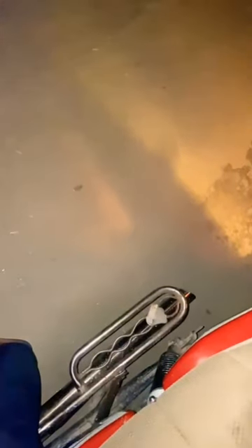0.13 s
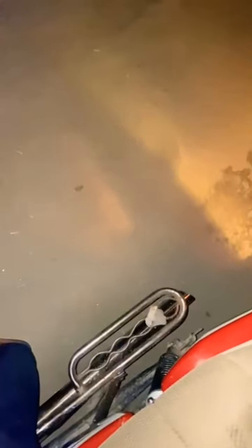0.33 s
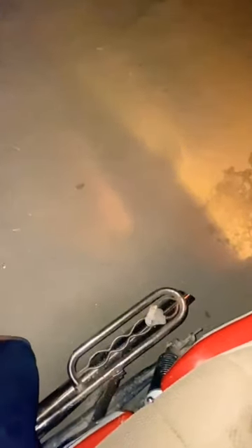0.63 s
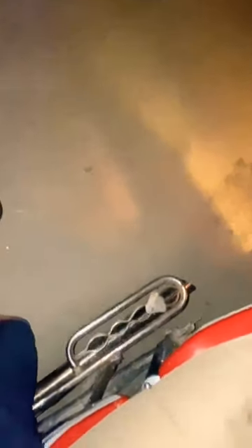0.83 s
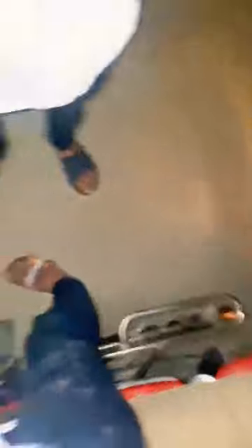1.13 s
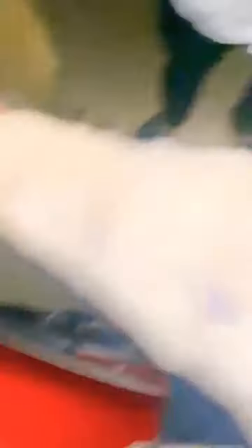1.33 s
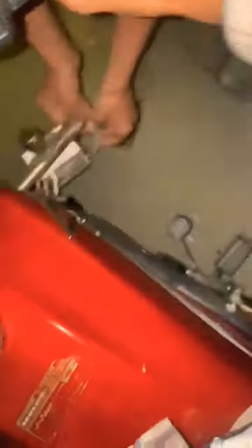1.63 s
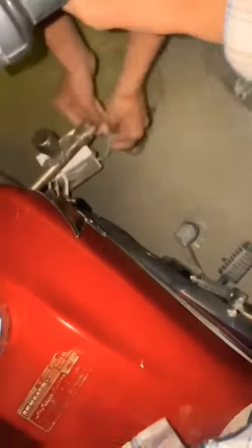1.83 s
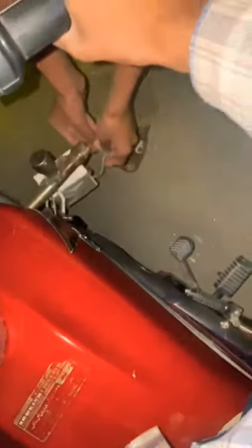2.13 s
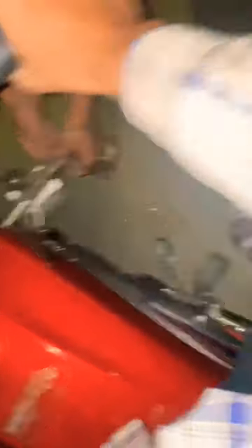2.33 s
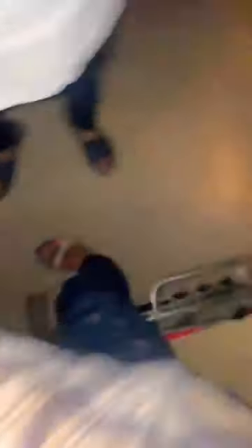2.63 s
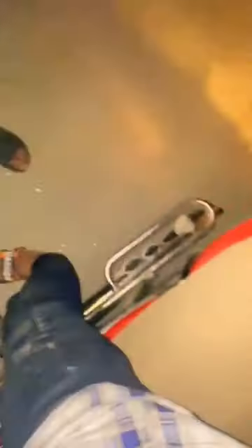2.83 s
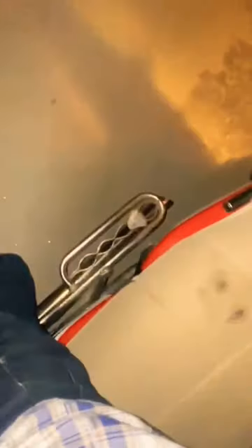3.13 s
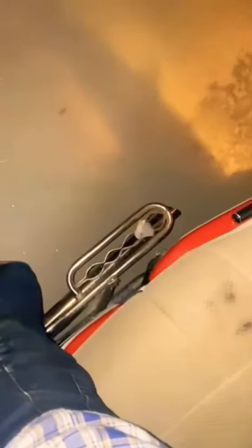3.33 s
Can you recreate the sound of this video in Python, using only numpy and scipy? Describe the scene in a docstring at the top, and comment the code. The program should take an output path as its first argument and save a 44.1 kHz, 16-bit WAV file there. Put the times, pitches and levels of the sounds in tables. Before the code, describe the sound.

A single-cylinder motorcycle revs steadily at a standstill outdoors, very close to a phone microphone; its booming exhaust crackles irregularly, with one loud pop midway and a louder one near the end.

```python
"""A single-cylinder motorcycle engine runs fast and unevenly at a standstill, close to a phone microphone.
Each firing is a soft push that rings the exhaust pipe with a boom. Many charges burn late and crack in the
pipe as decaying noise behind a sharp front, two of them as loud pops; the boom after a crack is early and dull.
The silencer rings with wavering notes, gas noise hisses once a cycle, and low turbulence rumbles.
"""
import sys
import numpy as np
from scipy import signal
from scipy.fft import rfft, irfft, next_fast_len
from scipy.io import wavfile
from scipy.ndimage import uniform_filter1d, map_coordinates

SR = 44100
rng = np.random.default_rng(int(sys.argv[2]) if len(sys.argv) > 2 else 0)


def to_wav(s):
    """Save 16-bit WAV."""
    ch = np.atleast_2d(s).T  # columns
    pcm = np.round(np.clip(ch, -1, 1) * 32767)  # PCM
    wavfile.write(sys.argv[1], SR, pcm.astype(np.int16))


N = 153468


def amp(db):
    """Turn decibels into a plain factor."""
    return 10 ** (np.asarray(db) / 20)


def unit(x):
    """Scale a sound to an rms of 1."""
    return x / np.sqrt(np.mean(x ** 2) + 1e-20)


def curve(rows):
    """Join (seconds, value) points by straight lines, one value per sample."""
    seconds, values = np.transpose(rows)
    return np.interp(np.arange(N) / SR, seconds, values)


def filtered(x, response):
    """Filter x with a response given as a function of frequency in Hz."""
    length = next_fast_len(N + SR // 2)  # spare room keeps the tail from wrapping round
    spectrum = rfft(x, length) * response(np.fft.rfftfreq(length, 1 / SR))
    return irfft(spectrum, length)[:N]


def resonance(f, hz, width):
    """Response of one resonance: strongest at hz, weaker on both sides."""
    return 1j * f * width / (hz * hz - f * f + 1j * f * width)


def ring_pipe(x, modes):
    """Ring several resonances at once; polarity sets which way each one swings."""
    return filtered(x, lambda f: sum(polarity * amp(db) * resonance(f, hz, width)
                                     for hz, width, db, polarity in modes))


def noise(spectrum, patchy_db):
    """Coloured noise of rms 1 with random louder and softer patches in time and frequency."""
    bins = signal.stft(rng.standard_normal(N), nperseg=512)[2]
    patches = uniform_filter1d(rng.standard_normal(bins.shape), 5, 0)
    patches = uniform_filter1d(patches, 6, 1)
    x = signal.istft(bins * amp(patchy_db * unit(patches)), nperseg=512)[1][:N]
    hz, db = np.transpose(spectrum)
    return unit(filtered(x, lambda f: amp(np.interp(np.log(f + 1), np.log(hz + 1), db))))


def even(x):
    """Noise with its slow lumps ironed out, so that each crack has its full size."""
    local_power = np.abs(uniform_filter1d(x ** 2, size=400))
    return unit(x / np.sqrt(local_power + .05))


def wobble(rate):
    """A smooth random curve through the given number of random points a second."""
    points = rng.standard_normal(int(N * rate / SR) + 4)
    return map_coordinates(points, [np.arange(N) * rate / SR])


def pulses(s, size):
    """Impulses at times s in seconds, each shared between the two nearest samples."""
    at = np.clip(s * SR, 0, N - 2)
    i = at.astype(int)
    return np.bincount(i, size * (1 - at + i), N) + np.bincount(i + 1, size * (at - i), N)


# How fast the engine runs. Each row: time in seconds, firings per second.
ENGINE_SPEED = [(0.0, 49.86), (0.1657, 52.68), (0.3314, 49.81), (0.4971, 53.16), (0.6629, 54.04),
                (0.8286, 55.24), (0.9943, 53.51), (1.16, 52.93), (1.3257, 54.21), (1.4914, 51.51),
                (1.6571, 51.46), (1.8229, 51.32), (1.9886, 52.47), (2.1543, 54.09), (2.32, 53.76),
                (2.4857, 52.94), (2.6514, 50.71), (2.8171, 50.85), (2.9829, 48.47), (3.1486, 48.33),
                (3.3143, 51.06), (3.48, 52.21)]
FIRST_PHASE = .018  # part of a cycle before the first firing


def crank():
    """Cycles turned since the start: the running sum of the speed."""
    return np.cumsum(curve(ENGINE_SPEED)) / SR - FIRST_PHASE


# Colour of the low turbulence. Each row: frequency in Hz, strength in dB.
RUMBLE_COLOUR = [(12, -59.5), (20, -37), (43, -9), (75, -9), (95, -5), (120, -27), (210, -120)]
RUMBLE_DB = -19  # against the boom


def rumble():
    """Low turbulence: patchy noise, mostly below 120 Hz."""
    return amp(RUMBLE_DB) * noise(RUMBLE_COLOUR, patchy_db=-4.5)


# Colour of the gas hiss. Each row: frequency in Hz, strength in dB.
HISS_COLOUR = [(900, -30), (1250, 7), (1400, -0.5), (1630, 2.5), (2070, -5), (2500, -4.5), (3900, -10),
               (4700, -16.5), (5250, -6.5), (5860, -10), (6490, -11), (10100, -21), (10600, -46),
               (11000, -52), (14300, -101), (22000, -120)]
# Loudness of the hiss, around which it swells. Each row: time in seconds, level in dB.
HISS_LEVEL = [(0.0, -49.5), (0.4, -44.5), (0.62, -42), (1.22, -43.5), (1.36, -46), (1.55, -46), (1.8, -43),
              (2.36, -44.5), (2.68, -46.5), (2.93, -44), (3.06, -43.5), (3.1, -49.5), (3.2, -44.5),
              (3.48, -42)]
PUFF_DB, PUFF_PHASE = 3, 0.76  # swell up and down in dB; part of the cycle where it is loudest
PATCH_DB = 3


def hiss():
    """Escaping exhaust gas: noise that swells once a cycle."""
    puff_db = PUFF_DB * np.cos(2 * np.pi * (crank() - PUFF_PHASE))
    return amp(curve(HISS_LEVEL) + puff_db) * noise(HISS_COLOUR, PATCH_DB)


# Notes of the silencer, two lower and three upper.
# Each row: frequency in Hz, width in Hz, average strength in dB within its group.
SILENCER_NOTES = [(437.4, 47.5, 3), (529.8, 62, 4), (660, 95, 0), (886, 61, 5.5), (1024.5, 93, -0.5)]
# Loudness of the two groups. Each row: time in seconds, level of the lower notes in dB, of the upper in dB.
SILENCER_LEVEL = [(0.0, -44, -46), (0.13, -43, -38), (0.47, -36.5, -44), (0.64, -43, -37), (0.72, -38, -46),
                  (0.87, -39, -38), (0.91, -42, -60), (1.12, -37.5, -61), (1.135, -34, -36),
                  (1.27, -38, -31.5), (1.35, -38, -41.5), (1.63, -42.5, -37), (1.75, -38, -38),
                  (2.35, -35, -34.5), (2.55, -36, -38), (3.06, -37, -35), (3.1, -52, -44.5),
                  (3.29, -27.5, -33.5), (3.48, -32, -35)]
ROAR_DB = -9  # gas noise against the firings
WAVER_DB, WAVER_S, WAVER_RATE = 4.5, .0004, 16  # swell in dB, bend in seconds, random points per second


def silencer(s, size):
    """Firings and gas roar ring the silencer; its notes waver, and the lower and upper ones swell apart."""
    drive = unit(pulses(s, size)) + amp(ROAR_DB) * rng.standard_normal(N)

    def note(hz, width, db):
        """One resonance that swells and bends at random."""
        x = filtered(drive, lambda f: resonance(f, hz, width) ** 2)
        bent_time = np.arange(N) + SR * WAVER_S * wobble(WAVER_RATE)
        bent = np.interp(bent_time, np.arange(N), x)
        return amp(db + WAVER_DB * wobble(WAVER_RATE)) * bent

    lower = unit(sum(note(*row) for row in SILENCER_NOTES[:2]))
    upper = unit(sum(note(*row) for row in SILENCER_NOTES[2:]))
    t, lower_db, upper_db = np.transpose(SILENCER_LEVEL)
    return amp(curve([*zip(t, lower_db)])) * lower + amp(curve([*zip(t, upper_db)])) * upper


RISE_S, HOLD_S = .0005, .005  # each crack rises fast and holds before it fades


def burst(db, t60):
    """Envelope of all cracks: fast rise, hold, then a fall of 60 dB in t60 seconds."""
    t = np.arange(SR // 10) / SR
    shape = (1 - np.exp(-t / RISE_S)) * amp(-60 * np.maximum(t - HOLD_S, 0) / t60)
    starts = pulses(np.array(LATE_BURNS)[:, 0], amp(db))
    return signal.fftconvolve(starts, shape)[:N]


# The late burns. Each row: start in seconds, strength in dB,
# then treble and knock in dB on top of that strength; each part of a crack also has its own trim below.
LATE_BURNS = [(0.03, -25, -14, -2), (0.087, -33.5, -3, 19.5), (0.127, -23, -11.5, 8),
              (0.146, -30, -5, 18.5), (0.281, -24, 3, 15.5), (0.361, -20, -9, 3), (0.378, -21, -9, 10.5),
              (0.458, -20.5, -8.5, -1), (0.478, -19, -10.5, 3), (0.493, -28, -4, 20), (0.534, -24.5, 2, 16),
              (0.589, -23, -5.5, 6.5), (0.646, -27, -1.5, 15), (0.685, -37, 1.5, 22),
              (0.738, -27.5, -1, 13), (0.778, -26.5, -5.5, 13), (0.81, -28.5, -4, 14),
              (0.935, -32.5, 3.5, 13), (1.05, -32.5, 6.5, 15.5), (1.107, -30.5, 2.5, -6),
              (1.184, -17.5, -11, 1), (1.221, -24, -9, 4), (1.257, -22.5, -11, 0), (1.331, -20, -10.5, -38),
              (1.505, -27, -26, 10.5), (1.6, -22.5, -18, 5), (1.658, -10.5, -5.5, -5), (1.783, -19, -28, 5),
              (1.804, -22, -45, 8.5), (1.821, -25, -28, -7), (1.871, -27, -39, -6), (1.894, -22, -33, 6),
              (1.914, -24, -29, 7), (1.968, -16.5, -7, 2.5), (2.005, -27, -13, 9), (2.061, -23, -25, 0),
              (2.103, -31.5, -24, 7), (2.139, -30.5, -34, -2), (2.23, -21.5, -21, 6), (2.249, -23, -20, 4),
              (2.323, -25, -18.5, 12), (2.436, -27, -37, -24), (2.474, -27, -30, 8), (2.551, -20, -13, -6),
              (2.562, -20.5, -12.5, -8), (2.668, -22, -12, 6), (2.71, -21.5, -14.5, 8),
              (2.726, -21.5, -26, 4.5), (2.845, -22, -10.5, 8.5), (2.985, -17.5, -12.5, 4),
              (3.067, -4, -8, -5.5), (3.11, -24, -37, -15), (3.151, -45, 0, 2), (3.168, -27, -17, 7.5),
              (3.234, -19, -24, 1), (3.272, -15, -18, 1.5), (3.31, -18, -13, 0), (3.363, -33, -16, 12),
              (3.388, -18, -14, 4), (3.408, -13, -18.5, -6), (3.464, -20, -11.5, 0)]
# Colour of the body of a crack. Each row: frequency in Hz, strength in dB.
RASP_COLOUR = [(500, -3), (650, 6.5), (800, 11), (950, 11), (1200, -1), (1600, -34), (2200, -56)]
# Colour of the treble of a crack. Each row: frequency in Hz, strength in dB.
SNAP_COLOUR = [(820, -34), (1400, 6), (1960, -0.5), (2520, -1.5), (2780, -6.5), (3270, -8.5), (6380, -11.5),
               (9870, -19), (11800, -34), (15300, -73.5), (22000, -120)]
RASP_DB, SNAP_DB, KNOCK_DB, SPIKE_DB = -6.5, -3.5, -12, 15  # trims
RASP_T60, SNAP_T60, KNOCK_T60 = .045, .035, .06  # seconds to fall by 60 dB
KNOCK_HZ, KNOCK_WIDTH_HZ = 515, 132
SPIKE_HZ, SPIKE_WIDTH_HZ = 1000, 2200  # the pressure front that opens a crack
CLANG_HZ, CLANG_WIDTH_HZ, CLANG_DB = 820, 43, 2.5  # the front rings the pipe end; dB against the front


def cracks():
    """Late burns in the pipe: a pressure front, then rasp, treble snap and mid knock made of noise."""
    s, db, treble_db, knock_db = np.transpose(LATE_BURNS)
    rasp = burst(db + RASP_DB, RASP_T60) * even(noise(RASP_COLOUR, patchy_db=-1.0))
    snap = burst(db + treble_db + SNAP_DB, SNAP_T60) * noise(SNAP_COLOUR, patchy_db=1.0)
    band = filtered(rng.standard_normal(N), lambda f: resonance(f, KNOCK_HZ, KNOCK_WIDTH_HZ) ** 2)
    knock = burst(db + knock_db + KNOCK_DB, KNOCK_T60) * even(unit(band))

    def front_response(f):
        clang = amp(CLANG_DB) * resonance(f, CLANG_HZ, CLANG_WIDTH_HZ)
        return resonance(f, SPIKE_HZ, SPIKE_WIDTH_HZ) ** 2 + clang

    front = filtered(pulses(s, amp(db + SPIKE_DB)), front_response)
    return front + rasp + snap + knock


JITTER_S, SIZE_DB = .00015, 1.2  # random spread of the firings in time and in size
AFTER_S = .016  # a firing this soon after a crack is upset


def firings():
    """Times and sizes of the firings, one per cycle, and which of them follow a crack."""
    turns = crank()
    s = np.interp(np.arange(int(turns[-1]) + 1), turns, np.arange(N) / SR)
    chance = rng.standard_normal((200, 2))[:len(s)]
    since_crack = s[:, None] - np.array(LATE_BURNS)[:, 0]
    upset = ((since_crack > 0) & (since_crack < AFTER_S)).any(axis=1)
    return s + JITTER_S * chance[:, 0], amp(SIZE_DB * chance[:, 1]), upset


# Low ring ahead of an upset firing.
# Each row: frequency in Hz, width in Hz, strength in dB, polarity (1 or -1 for upside down).
THUMP_NOTES = [(281, 69, -15, 1), (314.2, 20.4, -8, 1)]
# How strong the thump is against the boom. Each row: time in seconds, strength in dB.
THUMP_STRENGTH = [(0, 1.5), (.8, -2), (1.4, -1), (1.6, 6), (2.0, 3.5), (2.3, -2.5), (2.56, 3.5), (2.8, 2.5),
                  (3.48, 3)]
THUMP_LEAD_S = 0.00601


def thump(s, size):
    """A push shortly ahead of each upset firing gives a low ring."""
    return amp(curve(THUMP_STRENGTH)) * ring_pipe(pulses(s - THUMP_LEAD_S, size), THUMP_NOTES)


# Resonances of the exhaust pipe, lowest first.
# Each row: frequency in Hz, width in Hz, strength in dB, polarity (negative is upside down, size scales it).
PIPE_NOTES = [(145, 21, 3.5, 0.94), (207, 13.3, -16.5, 1), (236, 39, -14, 1), (292.4, 16.2, -7.5, -0.86)]
EARLY_S, WEAK_DB = 0.00228, 0.5  # an upset firing comes this much early, with this gain
PUSH_HZ, LOW_CUT_HZ = 475, 45  # softness of a firing; the pipe radiates little below the cut
MUFFLED_HZ, THIN_HZ = 330.5, 135  # the boom fades outside this band, steeply at the top


def boom(s, size, upset):
    """A soft push per firing rings the pipe; after a crack only its lowest note, early, behind a thump."""
    clean = ring_pipe(pulses(s, size * ~upset), PIPE_NOTES)
    dull = ring_pipe(pulses(s - EARLY_S, size * upset * amp(WEAK_DB)), PIPE_NOTES[:1])
    x = clean + dull + thump(s, size * upset)
    x = filtered(x, lambda f: 1 / np.sqrt((1 + (f / MUFFLED_HZ) ** 16) * (1 + (THIN_HZ / (f + 1)) ** 4)))
    return -unit(filtered(x, lambda f: (1j * f / (LOW_CUT_HZ + 1j * f) / (1 + 1j * f / PUSH_HZ)) ** 2))


# Loudness of the boom, carrying the rumble with it. Each row: time in seconds, level in dB.
ENGINE_LEVEL = [(0.0, -30), (0.03, -21.5), (0.16, -20.5), (0.22, -16), (1.63, -17.5), (1.67, -9.5),
                (1.7, -22), (1.73, -17), (1.88, -18), (2.4, -16), (2.49, -17), (2.57, -15), (2.59, -17),
                (2.97, -17), (3.0, -17), (3.05, -16), (3.14, -22.5), (3.22, -16), (3.39, -14.5),
                (3.41, -18), (3.46, -15), (3.48, -11)]


def scene():
    """Boom and rumble swell together; silencer, hiss and cracks are added at their own levels."""
    s, size, upset = firings()
    low = amp(curve(ENGINE_LEVEL)) * (boom(s, size, upset) + rumble())
    return (low + silencer(s - EARLY_S * upset, size) + hiss() + cracks())[None]


TOP_HZ = 12040  # band limit of the phone


def record(dry):
    """The phone rounds off the loudest peaks and keeps nothing above its band limit."""
    x = dry[0] / (1 + np.abs(dry[0] / .85) ** 4) ** (1 / 4)
    return filtered(x, lambda hz: hz < TOP_HZ)[None]


dry = scene()
out = record(dry)
to_wav(out)
```